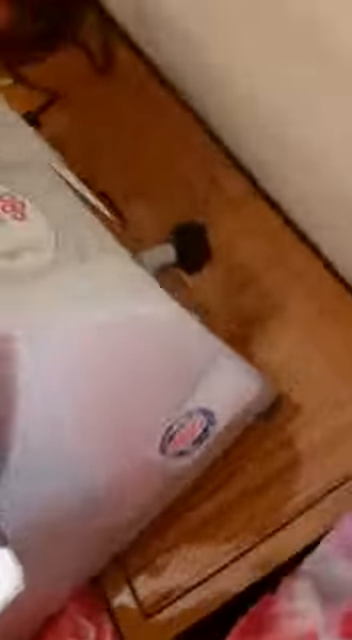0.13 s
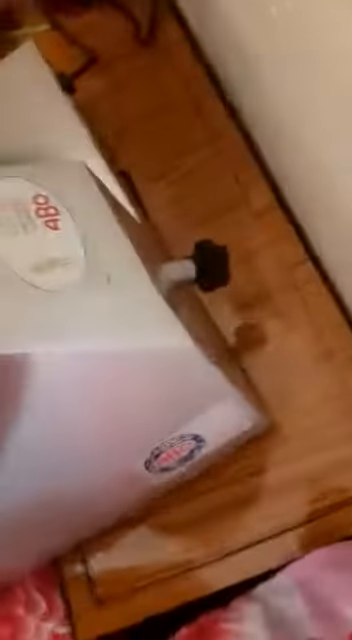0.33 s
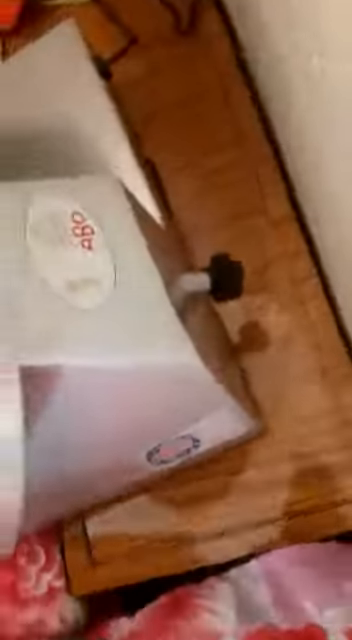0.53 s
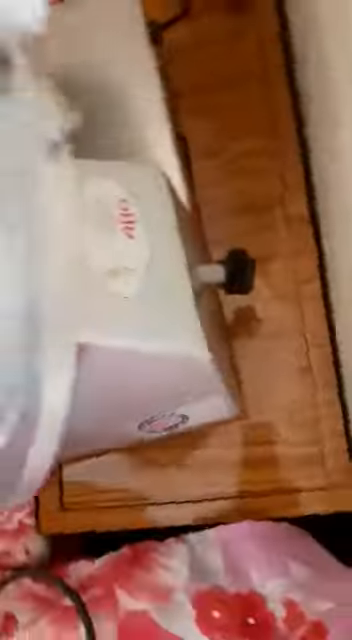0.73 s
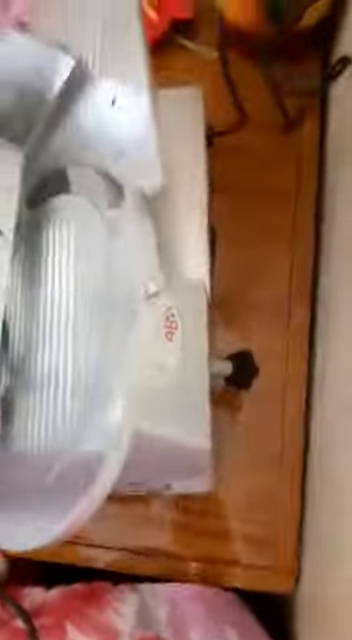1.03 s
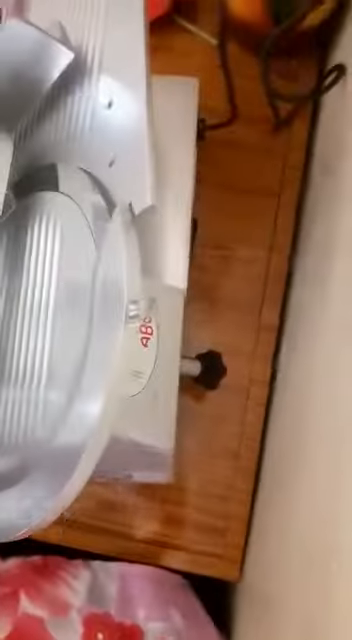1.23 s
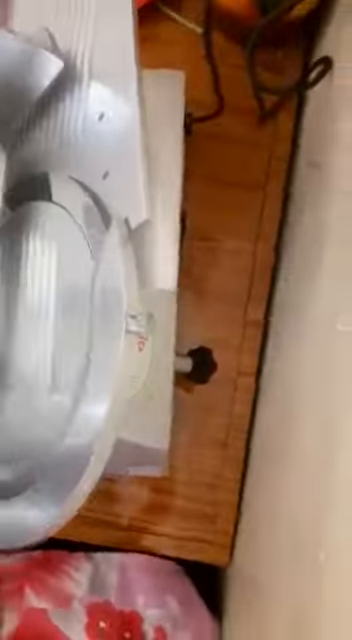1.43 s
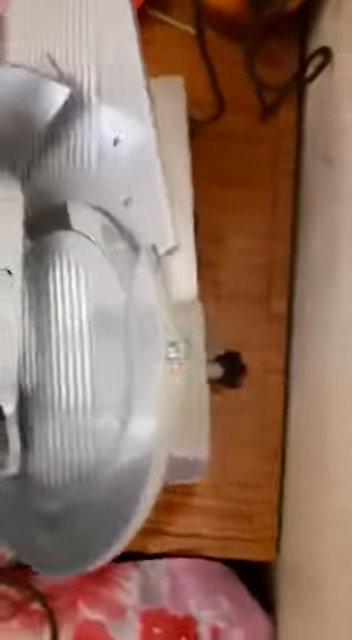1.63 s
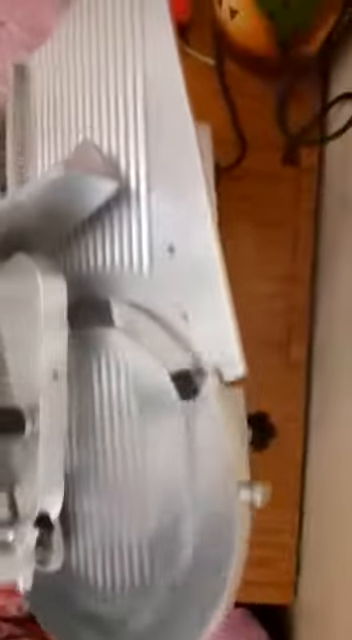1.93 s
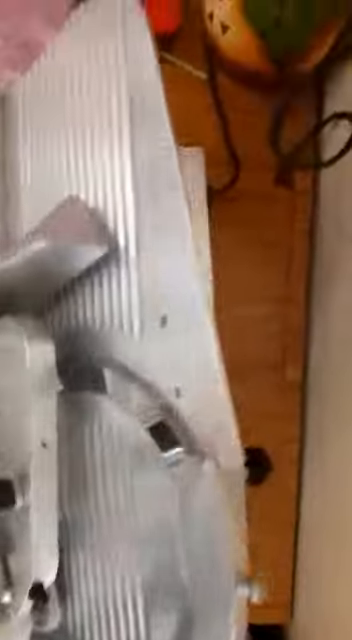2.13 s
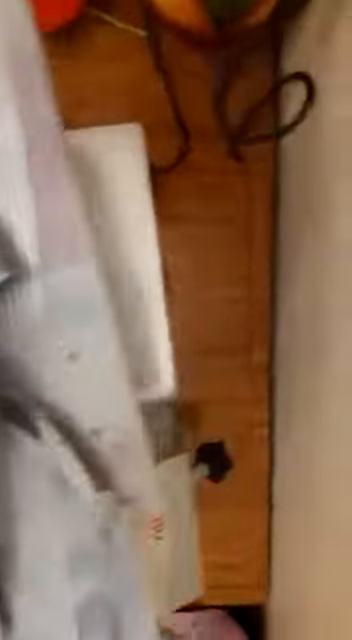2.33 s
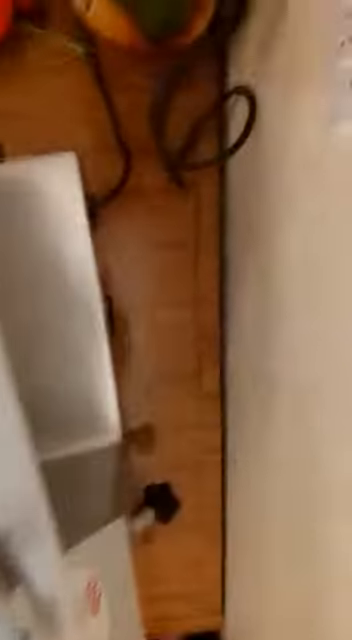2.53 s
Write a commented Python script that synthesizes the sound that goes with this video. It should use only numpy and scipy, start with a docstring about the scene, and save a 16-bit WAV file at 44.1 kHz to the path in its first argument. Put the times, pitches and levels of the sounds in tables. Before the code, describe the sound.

An electric meat slicer idles with a steady low hum and a few light knocks.

```python
"""In a small room, an electric meat slicer idles on a wooden cabinet, close to a hand-held camera.
Magnetic forces drive its housing at twice the mains frequency, and this hum dominates. The rotor adds
a faint whine, the drive a broadband whir, and friction keeps a resonance of the blade singing softly.
The hand on the camera rustles and ticks now and then, and three light knocks set the cabinet ringing."""
import sys
import numpy as np
from scipy import signal
from scipy.fft import rfft, irfft
from scipy.io import wavfile
from scipy.ndimage import uniform_filter1d

SR = 44100
rng = np.random.default_rng(int(sys.argv[2]) if len(sys.argv) > 2 else 0)


def put_to_file(sound):
    """Save the sound as 16-bit audio at rate SR, in the file named by the first command-line argument."""
    columns = np.atleast_2d(sound).T  # one column per channel
    safe = np.clip(columns, -1, 1)
    whole_steps = np.round(safe * 32767)
    wavfile.write(sys.argv[1], SR, whole_steps.astype(np.int16))


N = 118188
TIME = np.arange(N) / SR
FREQS = np.fft.rfftfreq(N, 1 / SR)


def amp(db):
    """Amplitude ratio of a level in decibels."""
    return 10 ** (np.asarray(db) / 20)


def unit(x):
    """Normalisation to rms 1."""
    return x / np.sqrt(np.mean(x ** 2) + 1e-20)


def read(points, hz):
    """Interpolation of a spectrum on a log-frequency axis."""
    f, value = np.transpose(points)
    return np.interp(np.log(hz + 1), np.log(f + 1), value)


def pan(db):
    """Two channel gains for a level difference, left minus right."""
    return amp(np.array([[.5], [-.5]]) * db)


def colour(x, points):
    """Spectral shaping that conserves the power of white noise."""
    return irfft(rfft(x) * unit(amp(read(points, FREQS))), N)


def drift(rate_hz):
    """Low-pass random fluctuation of rms 1."""
    return unit(irfft(rfft(rng.standard_normal(N)) / (1 + (FREQS / rate_hz) ** 4), N))


def burst(start, decay_s):
    """Envelope of a damped vibration: sudden onset, exponential decay."""
    return (TIME >= start) * np.exp(-np.maximum(TIME - start, 0) / decay_s)


def resonate(x, hz, width_hz):
    """Forced response of one steep resonance, scaled to rms 1."""
    return unit(irfft(rfft(x) / (1 + 2j * (FREQS - hz) / width_hz) ** 2, N))


def hand():
    """Stick-slip friction of skin on the camera body: grainy rubs, sharp ticks and a faint crackle."""
    # sliding strokes (time [s], duration [s], level [dB])
    strokes = [(0.027, 0.18, -55.5), (0.257, 0.092, -51), (0.38, 0.082, -59), (0.792, .17, -61),
               (1.41, 0.074, -61), (1.603, 0.13, -59), (2.185, 0.068, -56.5), (2.316, 0.092, -53),
               (2.614, 0.051, -60)]
    # ticks of the grip (time [s], level [dB])
    grip_ticks = [(0.134, -48), (0.168, -48), (0.3806, -47), (0.421, -44.5), (0.523, -44), (0.9009, -48),
                  (2.198, -53)]
    # friction spectrum (frequency [Hz], relative level [dB])
    skin_spectrum = [(300, -15), (2000, -2.5), (5000, -1), (7500, -2), (9200, 0), (12000, -0.5),
                     (16000, -3.5)]
    rise_s, fall_s, tick_s, slips_per_s = 0.01, 0.033, 0.0026, 93
    rubs = np.zeros(N)
    for start, length, db in strokes:
        attack = np.clip((TIME - start) / rise_s, 0, 1)
        release = np.clip((start + length - TIME) / fall_s + .5, 0, 1)
        rubs += amp(db) * attack * release
    grain = unit(amp(-drift(rate_hz=390)))
    ticks = sum(amp(db) * burst(start, tick_s) for start, db in grip_ticks)
    slips = (rng.random(N) < slips_per_s / SR) * rng.uniform(0.15, 1, N)
    crackle = amp(-65) * unit(signal.lfilter([1], [1, -np.exp(-1 / (tick_s * SR))], slips))
    friction = (rubs * grain + ticks + crackle) * rng.standard_normal((2, N))
    return colour(friction, skin_spectrum) * pan(db=5.5)


def knocks():
    """Impact excitation: each short crack is followed by the damped ring of the cabinet's modes."""
    # light impacts (time [s], level [dB])
    impacts = [(0.903, -44), (1.42, -45), (1.9135, -38)]
    # spectrum of the crack (frequency [Hz], relative level [dB])
    crack_spectrum = [(60, -6), (130, 11), (400, -6), (750, 2), (1200, 4), (2600, -1), (4300, 0),
                      (7000, -8), (16000, -19)]
    # cabinet modes (frequency [Hz], bandwidth [Hz], relative level [dB])
    modes = [(133, 43, -6), (750, 200, -5), (2880, 3300, -9)]
    crack_s, ring_rise_s, ring_decay_s = 0.0055, 0.0037, 0.044
    crack = sum(amp(db) * burst(start, crack_s) for start, db in impacts)
    tail = sum(amp(db) * (burst(start, ring_decay_s) - burst(start, ring_rise_s)) for start, db in impacts)
    noise = rng.standard_normal((2, N))
    crossfed = noise + noise[::-1] / 2
    ring = sum(amp(db) * resonate(crossfed, hz, width) for hz, width, db in modes)
    return colour(crack * noise, crack_spectrum) + tail * ring


def rotor_whine():
    """Tonal radiation of the rotor: thin wavering tones reach each microphone in a different phase."""
    # rotor tones (frequency [Hz])
    tone_hz = [842.4, 942.1, 1042.8, 2635.5]
    # strength of each tone (level [dB], left minus right [dB])
    tone_levels = [(-64.5, 1), (-63.5, -4), (-60, -6), (-64.5, 5)]
    wander_hz, flutter_depth, channel_phase_rad = 0.5, 0.4, np.array([[0], [1]])
    wander = np.cumsum(wander_hz * drift(rate_hz=4.8)) / SR
    tones = np.zeros((2, N))
    for hz, (db, pan_db) in zip(tone_hz, tone_levels):
        phase = 2 * np.pi * (hz * TIME + wander + rng.random()) + channel_phase_rad
        flutter = 1 + flutter_depth * drift(rate_hz=3.5)
        tones += amp(db) * pan(pan_db) * flutter * np.sin(phase)
    return np.sqrt(2) * tones


def blade_song():
    """Frictional excitation: light rubbing sustains one resonance of the steel disc."""
    # envelope of the ring (time [s], level [dB])
    ring_levels = [(0, -65), (0.13, -53.5), (0.55, -53), (1.05, -52.5), (1.55, -51), (1.8, -49),
                   (2.03, -54), (2.19, -51.5), (2.33, -49.5), (2.43, -53.5), (2.54, -45), (2.68, -48.5)]
    # brief added swells (time [s], level [dB])
    swells = [(0.552, -51), (0.868, -49.5), (2.2, -50), (2.531, -53.5), (2.6, -56)]
    correlation, swell_s = 0.4, .016
    right, independent = rng.standard_normal((2, N))
    left = correlation * right + np.sqrt(1 - correlation ** 2) * independent
    envelope = amp(np.interp(TIME, *np.transpose(ring_levels)))
    envelope += sum(amp(db) * np.exp(-((TIME - crest) / swell_s) ** 2) for crest, db in swells)
    return resonate(np.array([left, right]), hz=2597, width_hz=170) * envelope * pan(db=-7.5)


def drive_whir():
    """Broadband noise of belt, bearings and fan: coherent in the bass, diffuse in the treble."""
    # spectrum of the drive (frequency [Hz], relative level [dB])
    spectrum = [(20, -20), (50, -18), (66, -9.5), (90, -1.5), (125, -7), (160, -13.5), (200, -19.5),
                (235, -10.5), (262, -18), (320, -12.5), (400, -11), (450, -15), (545, -16.5), (600, -19.5),
                (700, -19.5), (1040, -20), (1130, -22.5), (1650, -23.5), (2100, -26), (2450, -23),
                (3050, -30.5), (4100, -31.5), (5000, -34.5), (7300, -41.5), (9500, -41.5), (16000, -44.5)]
    # midrange trend, taken about its mean (time [s], level [dB])
    trend = [(0.03, -45), (0.75, -44.8), (1.15, -45.5), (1.9, -46.5), (2.08, -47), (2.65, -47.5)]
    # response of each band to the trend (frequency [Hz], slope [dB/dB])
    follow = [(100, -0.86), (400, 1.5), (1000, 1), (4000, 0.65), (8000, 0.54)]
    # channel balance (frequency [Hz], left minus right [dB])
    balance = [(60, 1), (300, -0.5), (700, 0.5), (1400, -3.5), (2300, -7), (3000, -8.5), (4000, -5),
               (5000, -0.5), (7000, 1), (8900, 0), (9900, 3), (12000, 2), (16000, -1)]
    # likeness of the channels (frequency [Hz], correlation [1])
    coherence = [(25, 0.82), (60, 1), (100, 0.78), (270, 0.63), (450, 0.6), (740, 0.2), (1200, 0),
                 (3000, 0.0042), (9000, 0.015)]
    size, hop, patch_db, flicker_db = 1024, 256, 1.5, .5
    frames, hz = N // hop + 5, np.fft.rfftfreq(size, 1 / SR)
    real, imag, other_real, other_imag, patches = rng.standard_normal((5, frames, len(hz)))
    # the level fluctuates in time-frequency patches and flickers as a whole
    patches = unit(uniform_filter1d(uniform_filter1d(patches, size=10, axis=0), size=12, axis=1))
    flicker = unit(uniform_filter1d(rng.standard_normal(frames), size=5))[:, None]
    correlation = read(coherence, hz)
    left = real + 1j * imag
    right = correlation * left + np.sqrt(1 - correlation ** 2) * (other_real + 1j * other_imag)
    times, db = np.transpose(trend)
    trend_db = np.interp(np.arange(frames) * hop / SR, times, db - db.mean())[:, None]
    gain = amp(trend_db * read(follow, hz) + patch_db * patches + flicker_db * flicker)
    bands = np.array([left, right]) * gain * pan(read(balance, hz))[:, None]
    noise = signal.istft(bands.transpose(0, 2, 1), nperseg=size, noverlap=size - hop)[1][:, :N]
    return amp(-38) * unit(colour(noise, spectrum))


def motor_hum():
    """Forced vibration: magnetic pull shakes the housing at twice the mains frequency, with overtones."""
    # harmonics as the camera moves (time [s], level [dB] of each of harmonics 1 to 4)
    harmonic_levels = [(0, -20, -42.5, -41.5, -46), (0.58, -20.5, -44.5, -47, -41.5),
                       (0.8, -20.5, -45.5, -47, -46.5), (1.15, -20.5, -46, -50, -40.5),
                       (1.55, -20, -49, -51, -48), (1.88, -18.5, -53.5, -48.5, -48),
                       (2.3, -18.5, -57, -49, -47), (2.68, -18, -50, -46.5, -45)]
    # random amplitude modulation of each harmonic (rms depth [1])
    flutter_depths = [.012, .05, .07, .14]
    # amplitude modulation by the turning drive (rate [Hz], depth [1])
    throbs = [(7.3, .038), (10.7, .034)]
    hum_hz, wander_hz = 100.15, 0.13
    swell_hz, crest_s, swell_depth = 3.4, 0.6, 0.1
    cycles = np.cumsum(hum_hz + wander_hz * drift(rate_hz=3)) / SR
    times, *levels = np.transpose(harmonic_levels)
    tones = []
    for k, (db, depth) in enumerate(zip(levels, flutter_depths), 1):
        envelope = amp(np.interp(TIME, times, db)) * (1 + depth * drift(rate_hz=9.2))
        tones.append(envelope * np.sin(2 * np.pi * (k * cycles + rng.random())))
    # the highest harmonic also swells and fades periodically
    tones[-1] *= 1 + swell_depth * np.cos(2 * np.pi * swell_hz * (TIME - crest_s))
    throb = 1 + sum(depth * np.sin(2 * np.pi * (hz * TIME + rng.random())) for hz, depth in throbs)
    return np.sqrt(2) * sum(tones) * throb * pan(db=0.81)


def scene():
    """Linear superposition of the running slicer, the hand and the knocks."""
    return motor_hum() + rotor_whine() + drive_whir() + blade_song() + hand() + knocks()


def record(dry):
    """Band limiting: a steep linear-phase low-pass filter removes the highest treble."""
    low_pass = signal.firwin(801, cutoff=15780, window=("kaiser", 9), fs=SR)
    return signal.oaconvolve(dry, low_pass[None], "same")


dry = scene()
out = record(dry)
put_to_file(out)
```